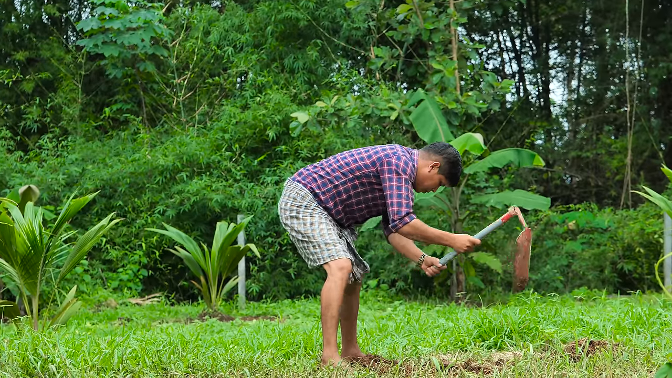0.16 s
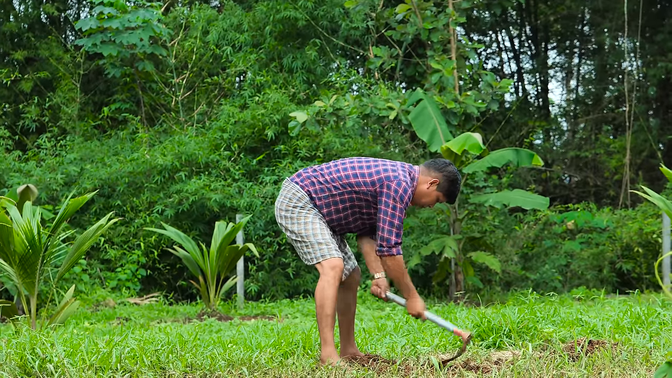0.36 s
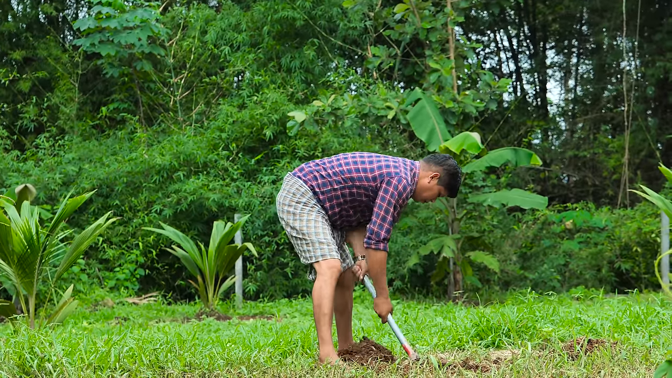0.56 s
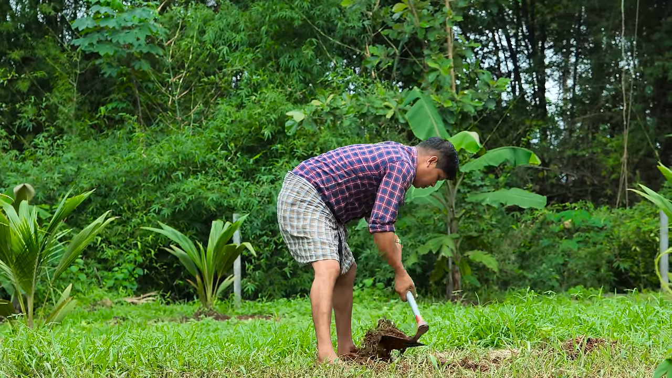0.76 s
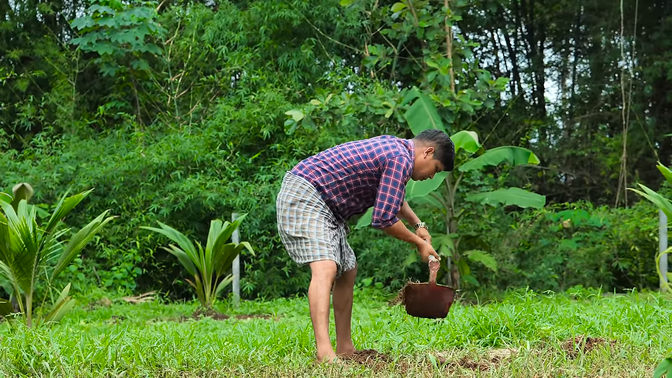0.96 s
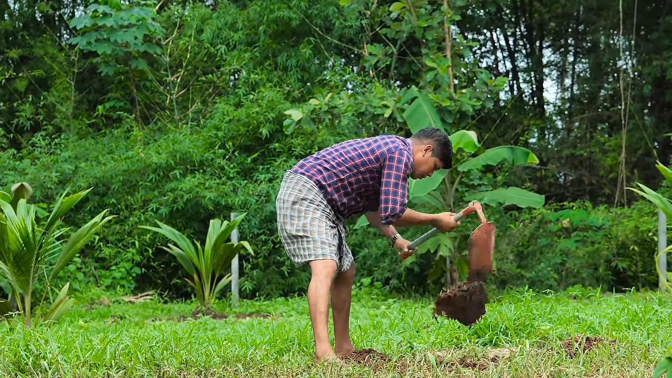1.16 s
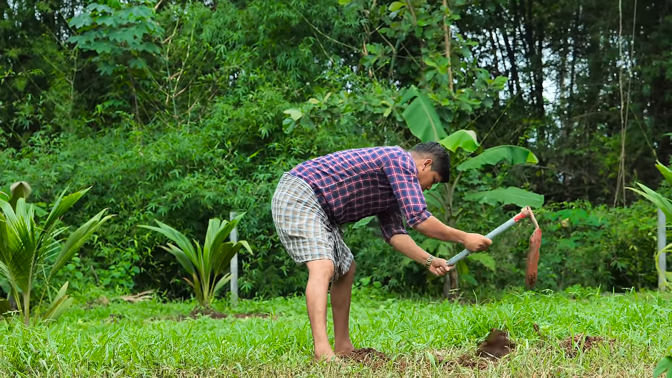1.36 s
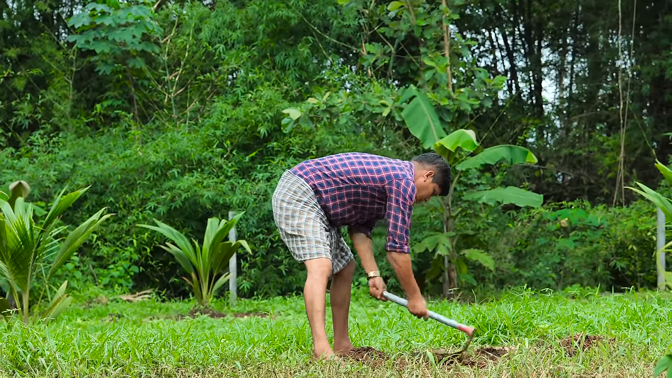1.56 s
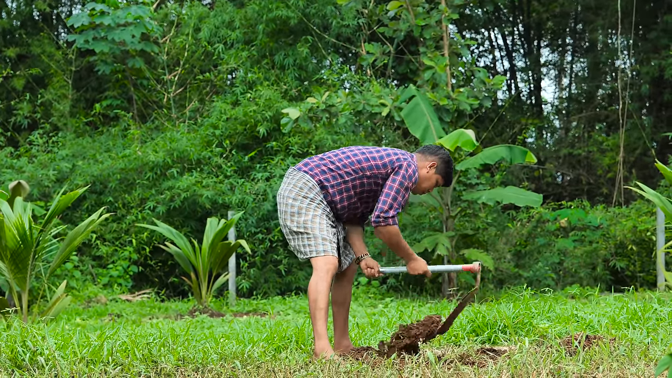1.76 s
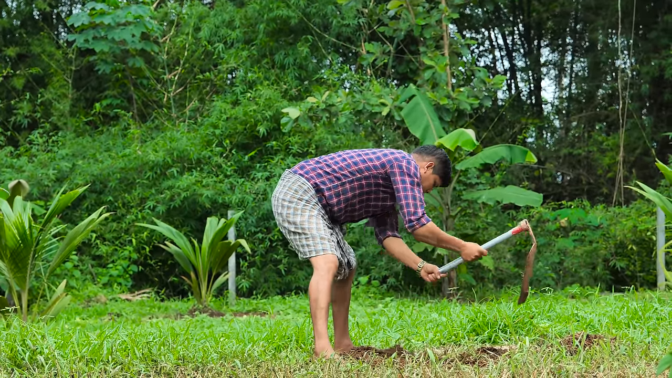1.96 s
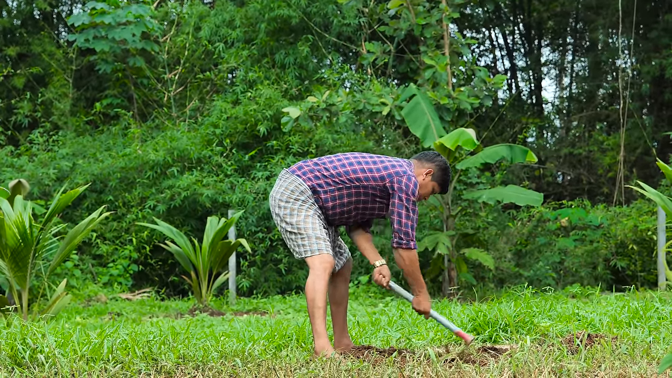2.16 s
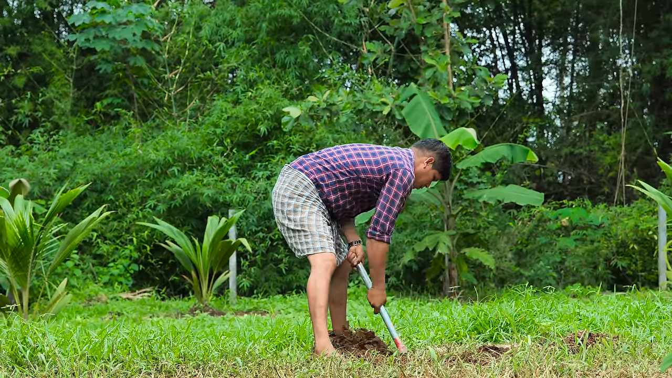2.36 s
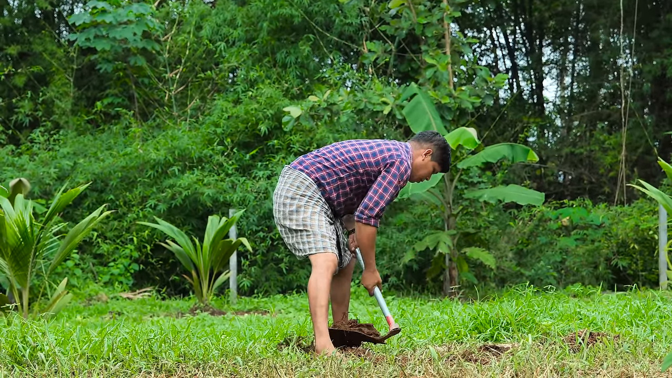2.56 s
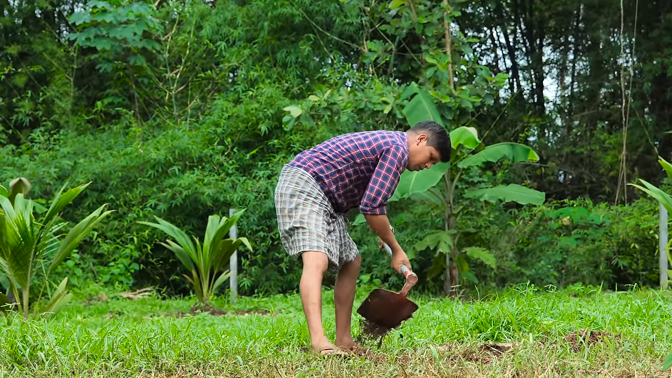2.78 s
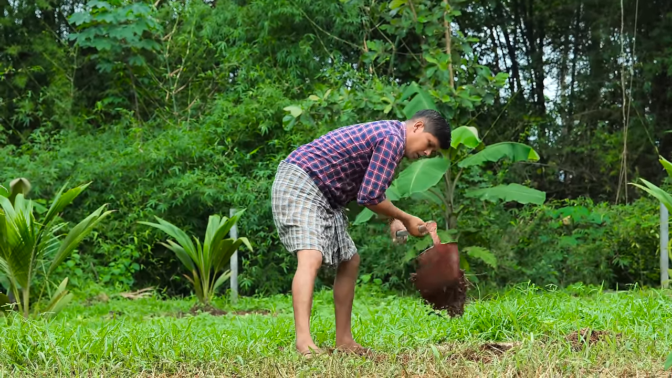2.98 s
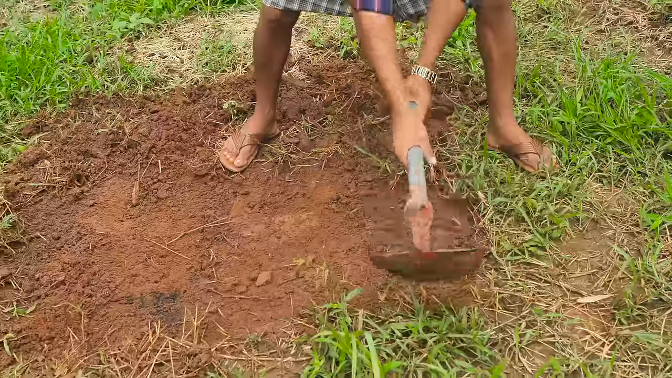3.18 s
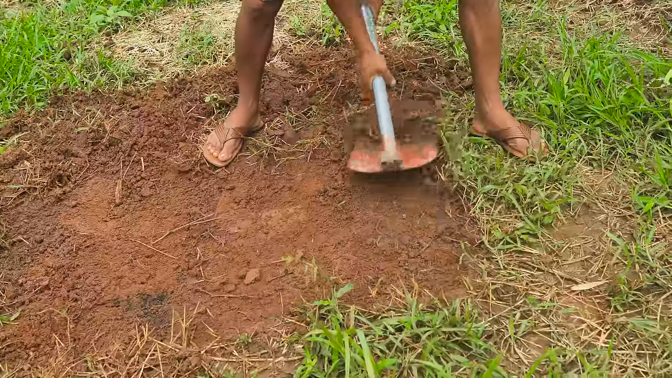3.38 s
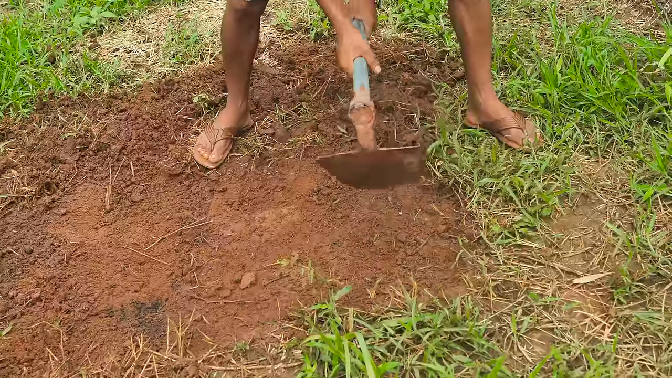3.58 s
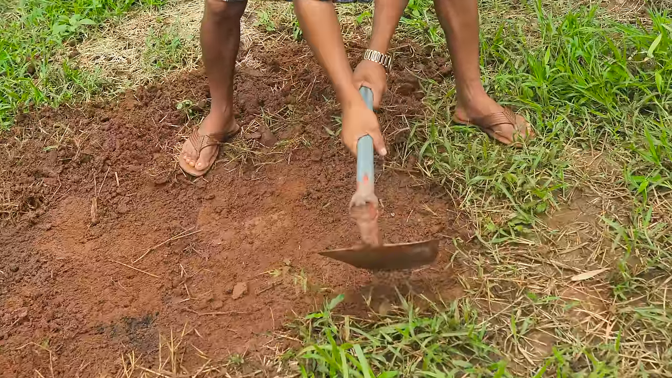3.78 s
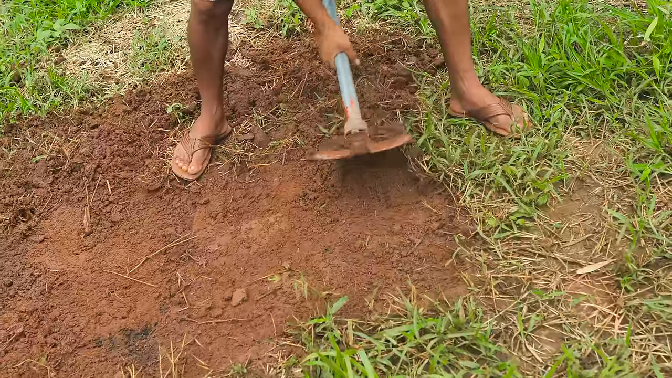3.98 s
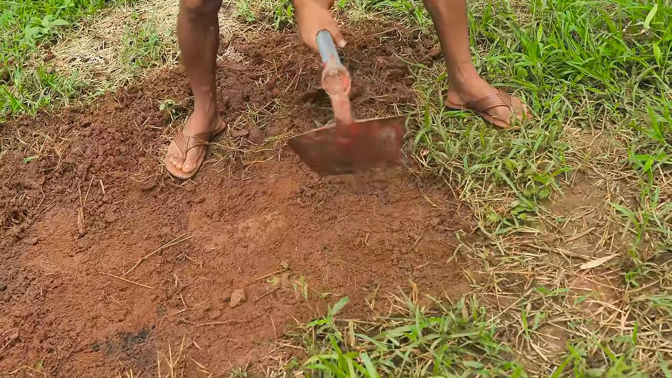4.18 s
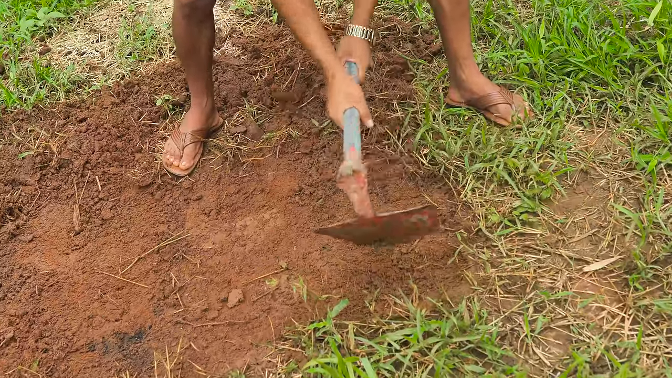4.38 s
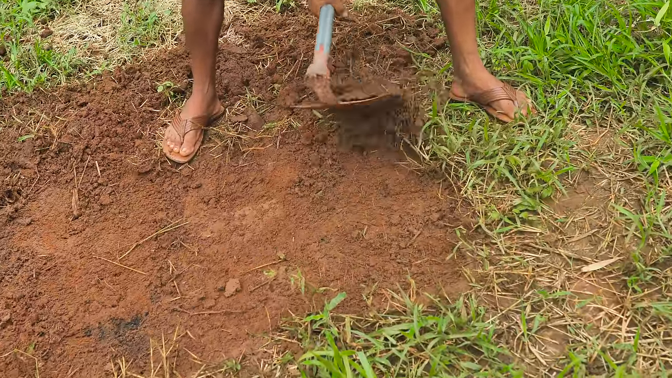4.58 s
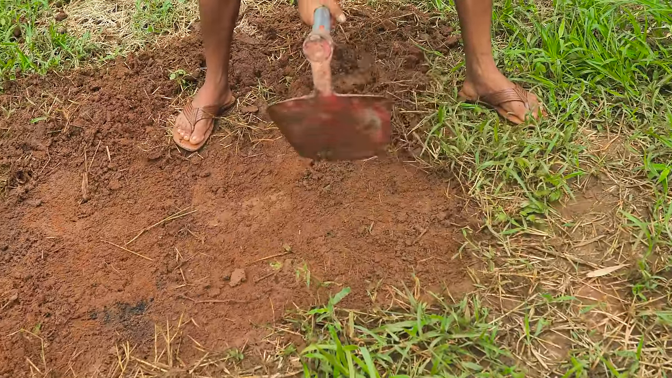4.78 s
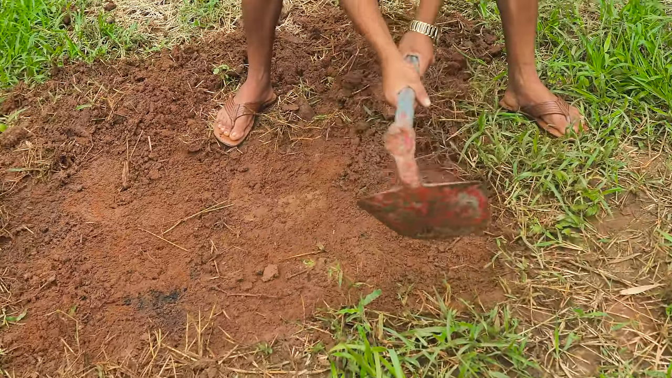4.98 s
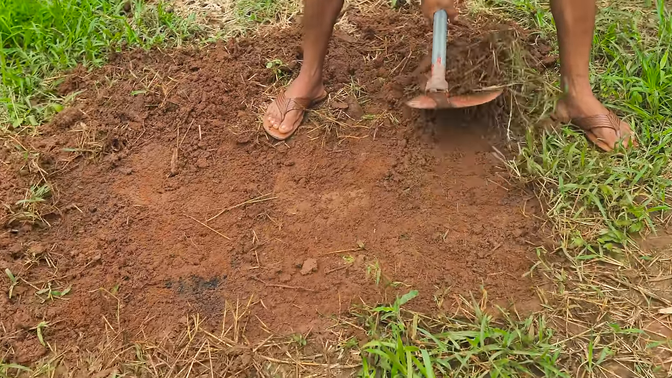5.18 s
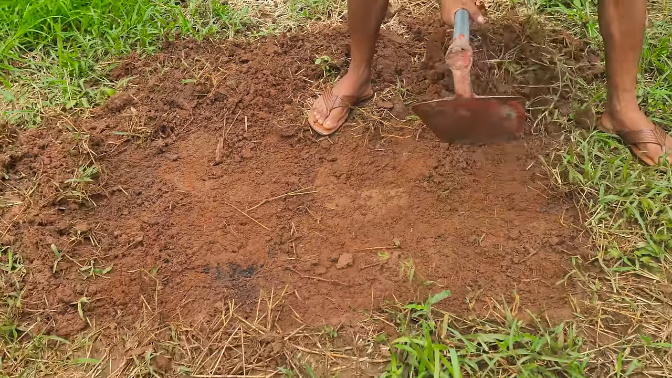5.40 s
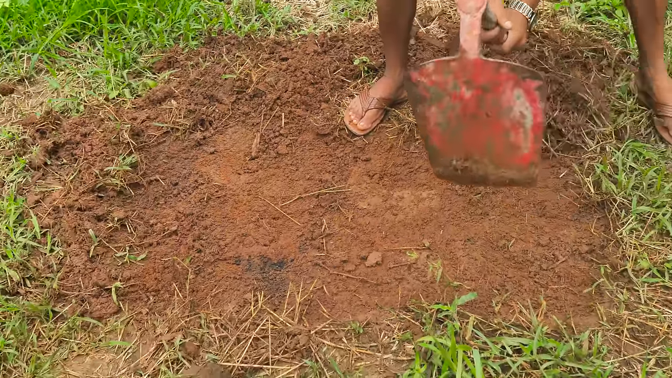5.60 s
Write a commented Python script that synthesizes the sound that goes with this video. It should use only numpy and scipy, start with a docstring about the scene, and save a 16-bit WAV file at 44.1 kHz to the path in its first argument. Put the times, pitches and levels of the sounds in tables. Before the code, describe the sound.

Close mono pickup of hoeing outdoors: three spaced chops with crumbling earth, falling clods, small squeaks and pebble pings, then a brief bird chirp and a sudden change to a fuller background. Four quicker chops follow, the second a heavy, hollow knock, the last a cluster of hard knocks, with grit trickling over faint insects.

```python
"""A steel hoe chops dry soil seven times in a garden clearing: crunches, knocks on hard ground, a little ringing.
Clods and grit fall, earth slides off the blade, a bird chirps once, insects sing over a soft outdoor hush.
At 3.1 s the background switches abruptly: louder hush, other insect levels, a faint hum.
Crunch and spills are random clicks through resonances; knocks and pings are damped sines, grit ticks noise
bursts, squeaks and rasps shaken tones, the bird a gliding sine, the background filtered noise."""
import sys
import numpy as np
from scipy import signal
from scipy.fft import rfft, irfft
from scipy.io import wavfile
from scipy.ndimage import uniform_filter1d

SR = 44100
rng = np.random.default_rng(int(sys.argv[2]) if len(sys.argv) > 2 else 0)


def persist_wave(psi):
    """Save psi, clipped to +-1, as 16-bit WAV."""
    counts = np.round(np.clip(psi, -1, 1) * 32767).astype(np.int16)
    wavfile.write(sys.argv[1], SR, np.atleast_2d(counts).T)


N = 248724
LN_60DB = np.log(1000)


def undb(db):
    """Decibels to amplitude ratio."""
    return 10 ** (np.asarray(db) / 20)


def level(x, db=0):
    """Scale x to the given RMS level."""
    return x * undb(db) / np.sqrt(np.mean(x ** 2))


def band(x, hz, width_hz):
    """Two-pole resonance, gain 1 at the centre."""
    return signal.lfilter(*signal.iirpeak(hz, hz / width_hz, fs=SR), x)


def colour(x, points):
    """Causal filter with the given (f/Hz, gain/dB) shape, from the folded cepstrum."""
    hz, db = np.transpose(points)
    size = 8192
    bin_hz = np.arange(size // 2 + 1) * SR / size
    log_gain = np.interp(np.log(bin_hz + 1), np.log(hz), db) * np.log(10) / 20
    ceps = irfft(log_gain)
    ceps[1:size // 2] *= 2
    ceps[size // 2 + 1:] = 0
    impulse = irfft(np.exp(rfft(ceps)))
    return signal.fftconvolve(x, impulse)[:N]


def walk(rate_hz):
    """Random levels held 1 / rate_hz and slewed; spread near 1."""
    k = int(SR / rate_hz)
    held = np.repeat(rng.standard_normal(N // k + 1), k)
    return 1.26 * uniform_filter1d(uniform_filter1d(held, k), k)[:N]


def add(track, start_s, sound):
    """Mix a short sound in at start_s."""
    i = int(start_s * SR)
    track[i:i + len(sound)] += sound[:N - i]


def grains(share, spread_db):
    """Breaking crumbs: a share of the samples are clicks with a long tail of big ones."""
    when, size, sign = rng.random((3, N))
    return (when < share) * np.sign(sign - .5) * undb(-spread_db * np.log(1 - size))


def crumbs(share, spread_db, clump_db):
    """Crumbs of each size ring briefly at their own pitch and break in their own clumps; fine ones are many."""
    out = 0
    for hz in 40 * 2 ** np.arange(0, 8.6, .5):
        many = min(share * (1 + hz / 2500), 1)
        ringing = band(grains(many, spread_db), hz, 0.43 * hz) / np.sqrt(many)
        out = out + ringing * undb(clump_db * walk(150))
    return out


def crunch():
    """Breaking crumbs make the dull soil body and the bright grit; the grit also rings the blade's modes."""
    # blade driving in: first bite t/s, rise/s, push/s, climb during push/dB, fall T60/s, body/dB, grit/dB
    chop_table = [(0.459, 0.009, 0.017, 12.5, .13, -15, -15),
                  (1.6045, 0.0061, 0.016, 13.5, .12, -22.5, -23.5),
                  (2.237, 0.066, 0.025, 1, .17, -21.5, -26), (3.369, 0.026, 0.0034, 5, 0.058, -21, -22),
                  (3.935, 0.032, 0.014, 0, .1, -20, -24), (4.533, 0.013, 0.029, -1, 0.11, -30, -26),
                  (5.145, 0.037, 0.035, 7.5, 0.095, -18.5, -22.5),
                  (5.209, .005, 0.0063, 12, 0.026, -23, -31), (5.221, .004, .006, -2, 0.032, -27, -33)]
    # loose soil spilling or dragged; at 1.389 the whoosh of the swung hoe:
    # peak t/s, e-fold rise/s, body/dB, grit/dB
    spill_table = [(0.03, 0.11, -79.5, -48.5), (0.614, 0.013, -39.5, -46.5), (0.689, 0.031, -41, -45.5),
                   (0.739, .003, -43.5, -46), (1.074, 0.014, -68, -51), (1.389, 0.019, -53.5, -49),
                   (1.69, 0.018, -44.5, -63), (1.785, .011, -68, -54), (2.07, 0.047, -54, -56.5),
                   (2.33, 0.011, -37, -43.5), (2.44, 0.11, -52, -50), (2.78, 0.025, -72, -58),
                   (2.929, .029, -51, -54.5), (2.966, 0.037, -49, -45.5), (3.03, 0.023, -51, -72),
                   (3.2, 0.19, -53.5, -58), (3.358, 0.01, -38.5, -44), (3.423, 0.025, -34.5, -39.5),
                   (4.63, 0.05, -43.5, -53), (5.33, 0.11, -69, -55), (5.519, 0.0073, -61, -46),
                   (5.605, 0.024, -55, -48.5)]
    # blade modes: f/Hz, width/Hz, relative level/dB
    blade_modes = [(923, 9.9, 6), (1930, 110, 10), (2100, 8.3, 0), (2650, 220, -6), (3140, 12, 4.5),
                   (3600, 60, -29), (3960, 81, -4), (4370, 300, 5), (5290, 98, -5)]
    # soil body spectrum: f/Hz, relative density/dB
    body_shape = [(15, -98), (25, 2), (144, -1.5), (524, 3.5), (694, 2), (832, -4.5), (981, 3), (1180, -3),
                  (1300, 1), (1690, -28.5), (2860, -120)]
    # grit spectrum: f/Hz, relative density/dB
    grit_shape = [(590, -48), (1000, 0.5), (1570, -1), (2590, -0.5), (3460, -6), (3890, -6), (10700, -23),
                  (13300, -18.5), (16000, -26)]
    # broken soil settling after each chop, re chop
    crumble_db, crumble_t60_s = -19.5, 0.38
    spill_t60_s = 0.27
    t, power = np.arange(N) / SR, 0

    def dying(start_s, t60_s):
        """Straight fall in dB after start_s, silent before."""
        return np.where(t > start_s, -60 * (t - start_s) / t60_s, -200)

    for s, rise_s, push_s, climb_db, t60_s, body_db, grit_db in chop_table:
        deep_s = s + push_s
        drive_db = np.interp(t, [s - rise_s, s, deep_s], [-60 - climb_db, -climb_db, 0], left=-200)
        bite_db = np.where(t < deep_s, drive_db, dying(deep_s, t60_s))
        # doubled dB: powers add
        shape = undb(2 * bite_db) + undb(2 * (crumble_db + dying(deep_s, crumble_t60_s)))
        power = power + shape * undb(2 * np.array([[body_db], [grit_db]]))
    for s, rise_s, body_db, grit_db in spill_table:
        shape = np.exp(2 * np.minimum((t - s) / rise_s, -LN_60DB * (t - s) / spill_t60_s))
        power = power + shape * undb(2 * np.array([[body_db], [grit_db]]))
    body_env, grit_env = np.sqrt(power)

    soil = crumbs(share=.04, spread_db=3.5, clump_db=3.0)
    blade = sum(undb(db) * band(soil, hz, width_hz) / np.sqrt(width_hz) for hz, width_hz, db in blade_modes)
    grit = level(colour(soil, grit_shape)) + level(blade, -11.5)
    # the crushing comes in jerks of a few milliseconds
    jerk = undb(1.56 * walk(200))
    return jerk * (body_env * level(colour(soil, body_shape)) + grit_env * level(grit))


def knocks():
    """Each knock is a soft push into one damped mode of the ground, with a short crack on top."""
    # blade on hard ground and clods landing: t/s, level/dB, f/Hz, crack re knock/dB
    knock_table = [(0.472, -14, 630, -4), (0.483, -15, 500, -4.5), (0.521, -27, 525, -13),
                   (0.541, -27, 545, -4), (0.631, -31.5, 640, -4.5), (0.675, -20, 541, -11),
                   (0.687, -34, 534, -6), (0.695, -31.5, 503, -18), (0.735, -26, 555, -3),
                   (0.77, -34.5, 530, -28), (1.612, -21, 544, -12), (1.895, -39.5, 473, -23),
                   (2.236, -25, 600, -6), (2.247, -20, 525, -1.5), (2.264, -19.5, 510, -9),
                   (2.329, -26.5, 920, -17), (2.346, -27.5, 740, -15), (2.356, -29, 450, -6),
                   (2.507, -34.5, 820, -4), (2.519, -34.5, 590, -8.5), (3.371, -15.5, 930, 1.5),
                   (3.376, -14, 700, -3), (3.383, -16.5, 970, -20), (3.426, -29, 720, -2),
                   (3.445, -28.5, 689, -27), (3.9355, -6.5, 593, -10), (3.948, -7, 693, -9),
                   (4.533, -18.5, 655, -17), (4.559, -36, 650, 11), (4.522, -35, 700, 0),
                   (4.641, -35.5, 690, -0.5), (4.653, -44, 650, -1), (5.149, -18.5, 690, -1),
                   (5.177, -11, 650, -9), (5.208, -16.5, 706, -5.5), (5.225, -20.5, 650, -3.5),
                   (5.245, -26, 640, -7)]
    t60_cycles = 10.3
    out, t = np.zeros(N), np.arange(SR // 8) / SR
    for s, db, hz, crack_db in knock_table:
        fall = (1 - np.exp(-t / 0.00085)) ** 2 * np.exp(-LN_60DB * t * hz / t60_cycles)
        brief = fall * np.exp(-t / 0.0058)
        noise = band(band(rng.standard_normal(len(t)), 1110, 1460), 1280, 2240)
        tone = fall / np.max(fall) * np.sin(2 * np.pi * hz * t)
        crack = brief / np.max(brief) * level(noise, crack_db)
        add(out, s, undb(db) * (tone + crack))
    return out


def snap():
    """One sudden pull of air, then a slower swing back of equal area."""
    # roots and hard clods breaking in one go: t/s, peak/dB
    snap_table = [(0.7357, -43), (1.2609, -20.5), (1.6208, -13), (2.2500, -6.5), (2.357, -30),
                  (3.3731, -12), (5.1833, -23), (5.517, -45)]
    fall_s, back_ratio = 0.00049, 4.1
    out, t = np.zeros(N), np.arange(SR // 20) / SR
    pulse = np.exp(-t / (back_ratio * fall_s)) / back_ratio - np.exp(-t / fall_s)
    for s, db in snap_table:
        add(out, s, undb(db) * pulse / np.max(np.abs(pulse)))
    return out


def rub(length_s, hz, sag_hz_per_s, rough_hz):
    """A tone that swells and fades, its pitch shaken at random."""
    t = np.arange(int(length_s * SR)) / SR
    drift = uniform_filter1d(rng.standard_normal(SR // 4), size=60)[:len(t)]
    pitch_hz = hz - sag_hz_per_s * t + rough_hz * level(drift)
    return np.sin(np.pi * t / length_s) * np.sin(2 * np.pi * np.cumsum(pitch_hz) / SR)


def rings():
    """Grazing makes the blade squeak on one sagging note; short rough tones are rasps and low pebble notes."""
    # blade's clear mode singing when grazed: t/s, length/s, level/dB
    squeak_table = [(0.424, 0.029, -37.5), (2.187, 0.034, -39.5), (4.40, 0.052, -57.5), (4.566, 0.025, -32),
                    (5.022, 0.026, -47.5), (5.061, 0.046, -47.5)]
    # earth scraping along the blade; the two near 3.3 kHz are the lower note of pebble pings:
    # t/s, f/Hz, level/dB
    rasp_table = [(1.703, 3300, -53), (1.773, 3260, -49.5), (2.306, 943, -35), (2.904, 817, -44),
                  (2.911, 1775, -45), (2.94, 1690, -45), (2.96, 1467, -42), (2.949, 1055, -46.5),
                  (2.991, 299, -44), (3.418, 690, -35.5), (5.517, 2730, -44.5)]
    squeak_hz, squeak_sag_hz_per_s, squeak_rough_hz = 2134, 400, 33
    rasp_s, rasp_rough_hz = 0.03, 110
    out = np.zeros(N)
    for s, length_s, db in squeak_table:
        add(out, s, undb(db) * rub(length_s, squeak_hz, squeak_sag_hz_per_s, squeak_rough_hz))
    for s, hz, db in rasp_table:
        add(out, s, undb(db) * rub(rasp_s, hz, 0, rasp_rough_hz))
    return out


def pings():
    """A pebble pings the blade's high mode: a short, clear, damped sine."""
    # pebble hits: t/s, level/dB
    ping_table = [(0.429, -37), (1.711, -42), (1.79, -50), (2.194, -41), (2.538, -48), (4.006, -52)]
    ping_hz, t60_s = 6450, 0.038
    out, t = np.zeros(N), np.arange(SR // 8) / SR
    fall = (1 - np.exp(-t / 0.00087)) * np.exp(-LN_60DB * t / t60_s)
    ring = fall * np.sin(2 * np.pi * ping_hz * t)
    for s, db in ping_table:
        add(out, s, undb(db) * ring)
    return out


def ticks():
    """Each tick is a dying spit of noise around its centre; fine dust patters at random throughout."""
    # grit and small stones clicking: t/s, level/dB, centre f/Hz
    tick_table = [(0.402, -35.5, 5100), (0.4232, -27, 5450), (0.6095, -48, 4620), (0.675, -40, 4000),
                  (0.737, -41, 4250), (0.7884, -45, 5300), (1.26, -31.5, 13400), (1.2875, -52, 13200),
                  (1.6748, -31.5, 12800), (1.709, -31.5, 6440), (1.781, -44, 5230), (1.797, -41, 6370),
                  (1.9, -48, 13000), (2.19, -35, 5700), (2.4312, -52, 4690), (2.7846, -40, 5500),
                  (3.1424, -36, 4670), (3.332, -46, 5000), (3.359, -33, 5500), (3.996, -35.5, 5450),
                  (4.189, -43.5, 4940), (4.615, -40, 4770), (4.6923, -38.5, 7400), (4.782, -41, 8000),
                  (4.856, -36, 4000), (5.1195, -39.5, 4750), (5.3208, -42, 5500), (5.517, -43, 4380)]
    t60_s = 0.014
    out, t = np.zeros(N), np.arange(SR // 8) / SR
    fall = (1 - np.exp(-t / 0.00053)) * np.exp(-LN_60DB * t / t60_s)
    for s, db, hz in tick_table:
        spit = level(band(rng.standard_normal(len(t)), min(hz, 15000), 0.26 * hz))
        add(out, s, undb(db) * spit * fall)
    hits = np.abs(grains(share=0.00049, spread_db=3.5))
    dust_env = signal.lfilter([1], [1, -np.exp(-1 / (0.0037 * SR))], hits)
    return out + undb(-66.5) * dust_env * level(band(rng.standard_normal(N), 13000, 11000))


def bird():
    """One whistle that shoots up and slides down, hoarse on the way up; the trees scatter it back."""
    # chirp track: t/s, f/Hz, level/dB
    chirp_table = [(2.998, 4200, -59), (3.004, 5170, -47), (3.015, 6300, -53), (3.03, 7200, -57),
                   (3.045, 6260, -49), (3.055, 5380, -49), (3.066, 4970, -41.5), (3.078, 4780, -67)]
    top_s = 3.03
    s, hz, db = np.transpose(chirp_table)
    t = np.arange(N) / SR
    hoarse_hz = np.where(t < top_s, 500, 60) * walk(900)
    tone = np.sin(2 * np.pi * np.cumsum(np.interp(t, s, hz) + hoarse_hz) / SR)
    tone = tone * undb(np.interp(t, s, db, left=-200, right=-200))
    trees = rng.standard_normal(SR // 3) * np.exp(-LN_60DB * t[:SR // 3] / 0.27)
    return tone + undb(-34) * signal.fftconvolve(tone, trees)[:N]


def clearing():
    """Leaves and far noise flicker by octave; insects hold narrow bands; a faint hum joins after the switch."""
    # hush spectrum: f/Hz, relative density/dB
    hush_shape = [(15, -41), (25, -3), (153, -1.5), (373, -4), (405, -8.5), (439, -2), (641, -7),
                  (1020, -9), (4870, -18), (6560, -22.5), (10100, -33), (11300, -32), (16000, -29.5)]
    # insect bands: f/Hz, width/Hz, level before/dB, level after/dB
    insect_table = [(2770, 390, -66.5, -62.5), (9500, 440, -75.5, -94), (11090, 1300, -70, -71.5)]
    switch_s, hush_before_db, hush_after_db = 3.1, -55.5, -52
    hum_hz, hum_width_hz, hum_db = 664.5, 24, -62.5
    before = np.arange(N) / SR < switch_s
    octaves = sum(band(rng.standard_normal(N), hz, hz) * undb(walk(9)) for hz in 16 * 2. ** np.arange(11))
    hush = level(colour(octaves, hush_shape)) * undb(np.where(before, hush_before_db, hush_after_db))
    insects = 0
    for hz, width_hz, before_db, after_db in insect_table:
        song = level(band(band(rng.standard_normal(N), hz, width_hz), hz, width_hz))
        insects = insects + song * undb(np.where(before, before_db, after_db) + 1.5 * walk(5.82))
    hum = level(band(rng.standard_normal(N), hum_hz, hum_width_hz), hum_db) * ~before
    return hush + insects + hum


def scene():
    """Sum of all sources, one channel."""
    return (crunch() + knocks() + ticks() + pings() + snap() + rings() + bird() + clearing())[None, :]


def record(dry):
    """The microphone loses the deepest bass, rounds the loudest peaks and cuts the top steeply."""
    top_hz = 15750
    thin = signal.sosfilt(signal.butter(2, 50, "high", fs=SR, output="sos"), dry)
    rounded = .8 * np.tanh(thin / .8)
    return signal.sosfilt(signal.ellip(10, .2, 70, top_hz, fs=SR, output="sos"), rounded)


dry = scene()
out = record(dry)
persist_wave(out)
```